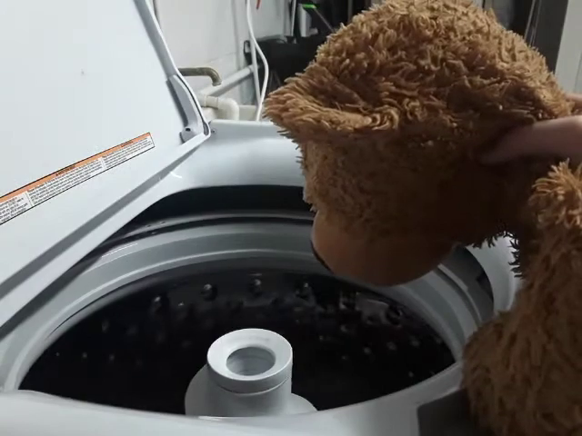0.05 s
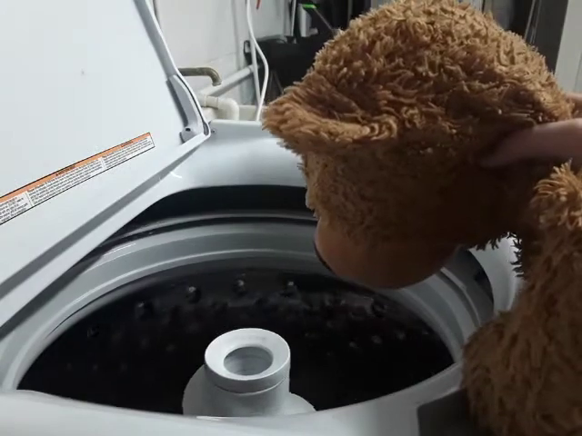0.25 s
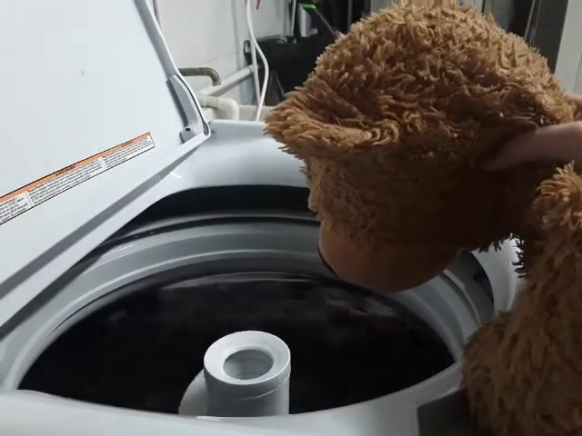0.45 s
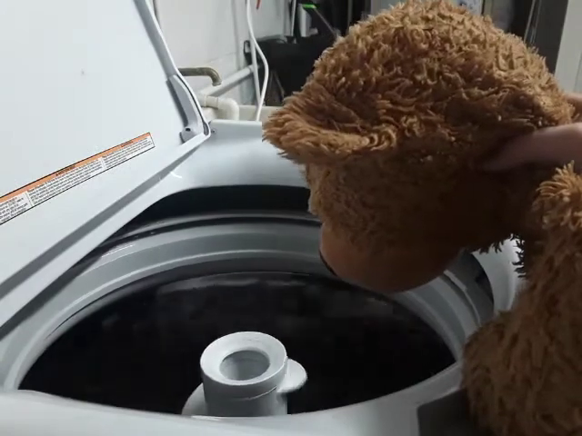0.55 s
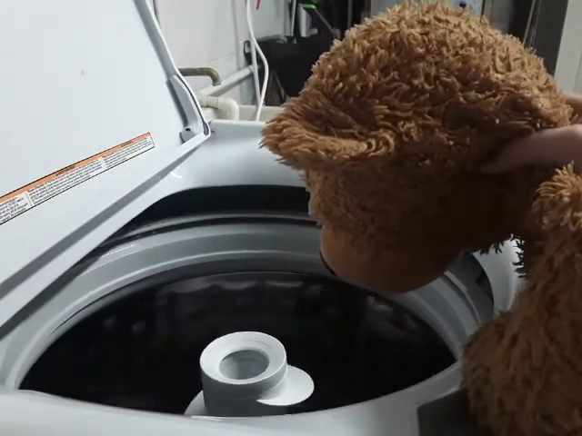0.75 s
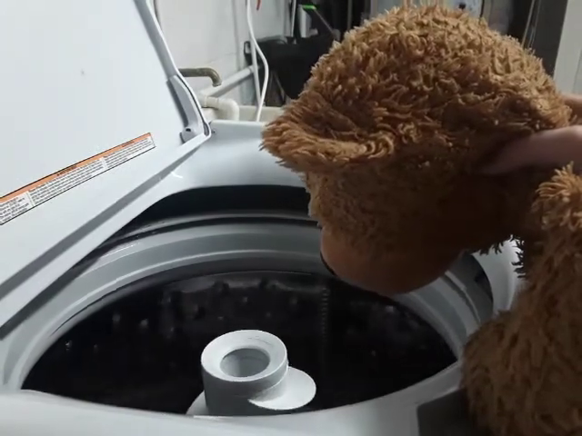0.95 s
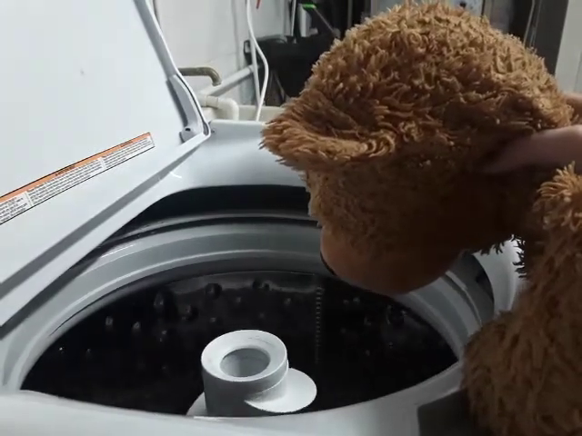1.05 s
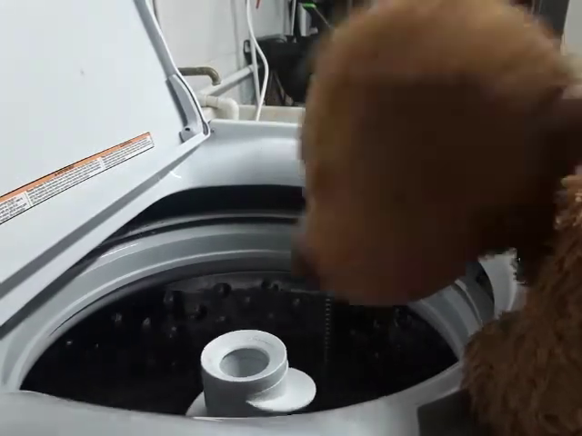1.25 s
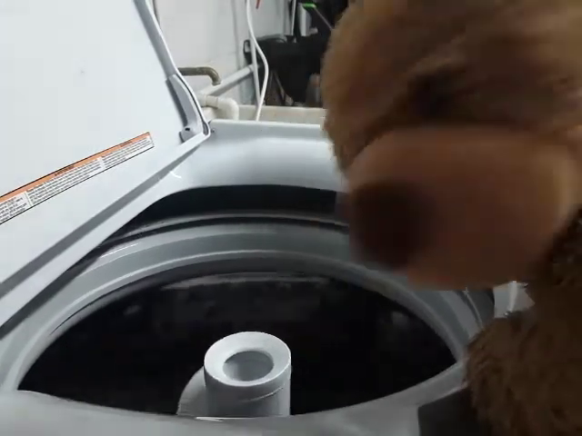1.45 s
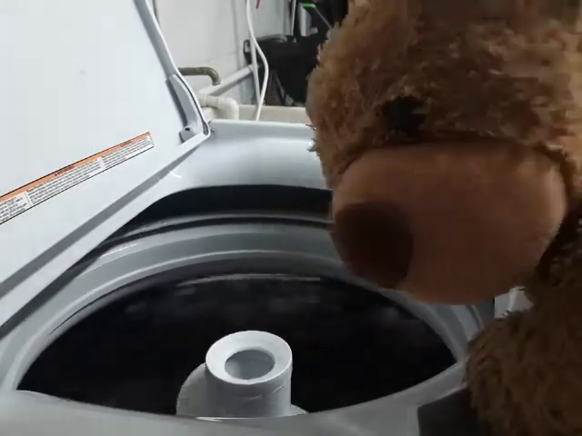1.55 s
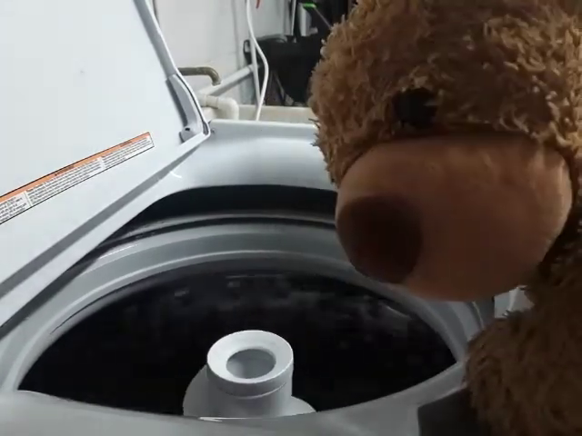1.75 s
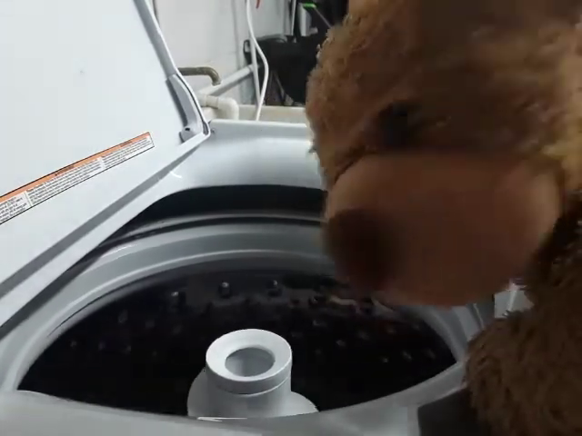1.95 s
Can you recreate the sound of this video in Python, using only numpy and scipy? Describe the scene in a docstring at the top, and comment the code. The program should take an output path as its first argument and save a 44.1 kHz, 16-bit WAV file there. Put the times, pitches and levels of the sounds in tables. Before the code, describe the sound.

A top-load washing machine agitates, heard close in wide stereo. The first 0.2 s is nearly quiet, with a low noise floor. At about 0.2 s the motor kicks in abruptly, humming, buzzing and whining as water swishes, splashing brightest near 0.55-0.6 s, then fading by 0.85 s. After a lull, a second stroke starts at 1.2 s, groans downward around 1.6 s, and water settles with a small splash near 1.8 s.

```python
"""Top-load washer agitating

Once a second the motor drives a stroke: sine hum and tones, and pulses with noise that ring the tub,
cabinet and gears. Shaped noise swishes and fizzes, short chirps make drops, and resonant noise bursts
make splashes, then the water settles. The second full stroke lets go with a falling groan.
Heard close, in wide stereo, with a short tail and a steady noise floor."""
import sys
import numpy as np
from scipy import signal
from scipy.fft import rfft, irfft
from scipy.io import wavfile
from scipy.ndimage import uniform_filter1d

SR = 44100
rng = np.random.default_rng(int(sys.argv[2]) if len(sys.argv) > 2 else 0)


def int16_out(signal):
    """Quantize to a 16-bit WAV file."""
    q = np.round(np.clip(np.atleast_2d(signal).T, -1, 1) * 32767)
    wavfile.write(sys.argv[1], SR, q.astype(np.int16))


N = 88200  # samples, 2 s


def amp(db):
    """Decibels to gain."""
    return 10 ** (np.asarray(db) / 20)


def evened(x):
    """Scale to rms 1."""
    return x / np.sqrt(np.mean(x ** 2) + 1e-20)


def read(points, hz):
    """Read a dB curve along a logarithmic pitch axis."""
    f, value = np.transpose(points)
    return np.interp(np.log(hz + 1), np.log(f + 1), value)


def level(table, column):
    """Column of a dB table as a gain over time."""
    rows = np.array(table)
    return amp(np.interp(np.arange(N) / SR, rows[:, 0], rows[:, column]))


def slow(rate):
    """Random wander of rms 1: noise averaged twice over 1/rate seconds."""
    width = int(SR / rate)
    return evened(uniform_filter1d(uniform_filter1d(rng.standard_normal(N), width), width))


def resonate(x, hz, width):
    """A fixed one-pole resonance with a gain of about 1 at its centre."""
    r = np.exp(-np.pi * width / SR)
    return 2 * signal.lfilter([1 - r], [1, -r * np.exp(2j * np.pi * hz / SR)], x).real


def resonate_twice(x, hz, width):
    """Two equal resonances in a row, evened to rms 1."""
    return evened(resonate(resonate(x, hz, width), hz, width))


def coloured(x, spectrum):
    """Weight the whole spectrum by a dB curve, then even it to rms 1."""
    return evened(irfft(rfft(x) * amp(read(spectrum, np.fft.rfftfreq(N, 1 / SR))), N))


def noise(spectrum, patchy_db, flicker_db):
    """Random short-time spectra with drifting patches and a flicker shared by all pitches."""
    frames, hz = N // 128 + 5, np.fft.rfftfreq(512, 1 / SR)
    a, b, patches = rng.standard_normal((frames, 257, 3)).T
    patches = evened(uniform_filter1d(uniform_filter1d(patches, 8, 0), 10, 1))
    flicker = evened(uniform_filter1d(rng.standard_normal(frames), 3))
    gain = amp(read(spectrum, hz)[:, None] + patchy_db * patches + flicker_db * flicker)
    return evened(signal.istft((a + 1j * b) * gain, nperseg=512, noverlap=384)[1][:N])


def load(column):
    """Motor load as a gain: each full stroke switches on abruptly, then follows its own curve."""
    # end of one stroke and two more, one list each: (time [s], hum level [dB], tub level [dB],
    # cabinet buzz level [dB], gear whine level [dB]), before the mix trims
    strokes = [
        [(0.0, -62, -38.5, -70, -58), (0.036, -57, -63, -89, -91), (0.072, -61, -69, -91, -83),
         (0.092, -60, -70, -91, -89), (0.104, -72.5, -66, -86, -100), (0.118, -74, -88, -86, -100),
         (0.128, -64, -89, -94, -90), (0.138, -80, -86, -98, -100), (0.166, -68, -87, -98, -100),
         (0.186, -83, -93, -106, -100), (0.2, -86, -87, -77, -99)],
        [(0.226, -92, -42, -41.5, -81), (0.268, -39, -36.5, -36.5, -69), (0.326, -42.5, -32, -31, -30),
         (0.364, -35, -33.5, -36.5, -37), (0.528, -43.5, -32.5, -32, -33.5), (0.608, -49, -33, -42, -44),
         (0.654, -44, -42, -51, -52.5), (0.85, -73, -54, -77, -112), (0.952, -56.5, -58.5, -76.5, -83),
         (1.036, -79, -98, -94, -71), (1.128, -63, -100, -92, -110), (1.186, -91, -91, -93, -100),
         (1.2, -84, -75, -79, -106)],
        [(1.226, -57, -41.5, -41, -67), (1.286, -43.5, -38.5, -36.5, -77), (1.352, -36, -37, -42, -44.5),
         (1.388, -41, -37, -40, -40), (1.42, -30, -36.5, -40.5, -51), (1.442, -36.5, -31.5, -36, -36.5),
         (1.56, -36, -35, -38, -42), (1.586, -52, -30, -43.5, -41.5), (1.66, -52, -54, -60, -53),
         (1.738, -48.5, -45, -51, -59), (1.772, -72, -44, -56, -50), (1.928, -55.5, -55.5, -67, -70),
         (2.0, -64, -58, -75, -83)],
    ]
    switch_on_s = 0.013
    jolt_db = -13.5  # level just after switch-on, relative to the stroke's first point
    rows = list(strokes[0])
    for stroke in strokes[1:]:
        on = stroke[0][0] - switch_on_s
        jolt = np.array(stroke[0][1:]) + jolt_db
        rows += [(on, *rows[-1][1:]), (on + switch_on_s / 4, *jolt), *stroke]
    return level(rows, column)


def background():
    """A steady noise floor, shaped by one fixed spectrum."""
    # noise floor spectrum: (frequency [Hz], relative level [dB])
    floor_curve = [(25, -21), (70, -1), (120, 13), (250, -7.5), (450, -27), (1200, -34.5), (2500, -20.5),
                   (5000, -28), (6600, -15.5), (7700, -35), (9500, -68), (13000, -8), (15800, -28)]
    return amp(-63) * coloured(rng.standard_normal(N), floor_curve)


def hum():
    """The windings hum at about twice the mains rate, wavering a little in pitch and level."""
    pitch_hz, pitch_waver_hz, level_waver_db = 119.2, 0.61, 1.5
    turns = np.cumsum(pitch_hz + pitch_waver_hz * slow(8.6)) / SR
    tone = np.sqrt(2) * np.sin(2 * np.pi * turns)
    return load(column=1) * tone * amp(level_waver_db * slow(21))


def ring(drive, modes, swell_db):
    """Each mode rings and swells on its own; neighbours alternate in sign."""
    total = 0
    for k, (hz, width, db) in enumerate(modes):
        total = total + (-1) ** k * amp(db + swell_db * slow(12.8)) * resonate_twice(drive, hz, width)
    return evened(total)


def motor():
    """Mains-rate pulses and rough noise shake tub, cabinet and gears, which ring at their modes."""
    # modes of tub, cabinet and gears: (frequency [Hz], width [Hz], relative level [dB])
    tub_modes = [(170.8, 50, -4), (200, 21.4, -4.5), (234.2, 28, 0), (287.2, 22, 0.5), (325.8, 24.4, -1.5),
                 (363, 21.7, 0.5), (392.6, 49, -7)]
    cabinet_modes = [(467.9, 49, 0), (530.4, 35, -3.5), (600, 30, -2.5), (704, 36, -15.5), (738, 11, -12)]
    gear_modes = [(795, 20, -11), (896, 34, 2), (1015, 150, -7), (1098.4, 26, 3.5), (1157.4, 17.6, -0.5),
                  (1304, 11, -19), (1635, 17, -5), (1679, 20, -8.5), (2270, 75, -7), (2430, 40, -1),
                  (2556, 100, -4)]
    # broad rumble spectrum: (frequency [Hz], relative level [dB])
    rumble_curve = [(40, -58), (70, -24), (95, -23), (150, -1.5), (400, 2), (650, -16), (1150, -6.5),
                    (1400, -16.5), (3000, -44.5), (6000, -61)]
    mains_hz, jitter, rough = 58.47, 0.02892, 0.66  # jitter: rms fraction of the rate; rough: noise share
    turns = np.cumsum(mains_hz * (1 + jitter * slow(59.8))) / SR
    pulses = np.diff(np.floor(turns), prepend=0) * amp(3.4 * slow(35))
    roughness = rng.standard_normal(N) * amp(1.63 * slow(110))
    drive = (1 - rough) * evened(pulses) + rough * roughness

    tub_load, cabinet_load = load(column=2), load(column=3)
    rumble = amp(-5) * coloured(drive, rumble_curve) * np.sqrt(tub_load * cabinet_load)
    rings = tub_load * ring(drive, tub_modes, swell_db=0.6)
    rings += cabinet_load * ring(drive, cabinet_modes, swell_db=0.5)
    rings += load(column=4) * ring(drive, gear_modes, swell_db=3.6)
    return rumble + amp(-4.5) * rings


def tones():
    """Cleaner lines: a rotor tone gliding through each stroke, and a gear mesh following the whine."""
    # rotor tone, one list per full stroke: (time [s], pitch [Hz], level before trim [dB])
    rotor_strokes = [
        [(0.23, 473.7, -41), (0.33, 493.4, -59), (0.334, 489.7, -31), (0.472, 466.2, -26), (0.486, 464.1, -54),
         (0.494, 468.5, -31), (0.538, 461.0, -21), (0.6, 465.8, -34.5)],
        [(1.23, 471.5, -41.5), (1.256, 478.8, -32.5), (1.41, 476.1, -39), (1.436, 467.2, -43),
         (1.456, 463.4, -54), (1.488, 475.4, -26), (1.514, 475.1, -46), (1.56, 475.3, -42)],
    ]
    rows = [(0, 470, -90), (.212, 470, -70), (.217, 470, -48), *rotor_strokes[0], (.64, 460, -80),
            (1.212, 470, -90), (1.217, 470, -48), *rotor_strokes[1], (1.6, 470, -80)]
    times, pitches, _ = np.transpose(rows)
    rotor_hz = np.interp(np.arange(N) / SR, times, pitches) + 4.0 * slow(37)
    rotor_gain = amp(-5 + 2.9 * slow(39)) * level(rows, column=2)
    rotor = rotor_gain * np.sin(2 * np.pi * np.cumsum(rotor_hz) / SR)
    mesh_hz = 1174 + 3.43 * slow(30)
    mesh = amp(-4) * load(column=4) * np.sin(2 * np.pi * np.cumsum(mesh_hz) / SR)
    return rotor + mesh


def drops():
    """Tiny bubbles at random moments: short decaying sines that rise slightly in pitch."""
    drops_per_s, spread_db = 3600, -10  # spread: average fall below the loudest drop
    size = amp(spread_db * np.minimum(rng.exponential(1, N), 4)) * (rng.random(N) < drops_per_s / SR)
    kind, out = rng.integers(0, 24, N), np.zeros(N)
    for k, hz in enumerate(np.geomspace(1300, 7000, 24)):
        u = np.arange(int(14 * SR / hz)) * hz / SR  # time in cycles of the starting pitch
        bubble = np.sin(2 * np.pi * u * (1 + 0.0096 * u)) * u * np.exp(-u / 1.25)
        out += signal.oaconvolve(size * (kind == k), bubble)[:N]
    return evened(out)


def water():
    """Moving water: a noise swish mixed with drops, and a fine fizz above it."""
    # water motion: (time [s], swish level [dB], fizz level [dB]), before the mix trims
    motion = [(0.0, -60.5, -66), (0.19, -81.5, -69.5), (0.32, -42.5, -52), (0.34, -45, -51.5),
              (0.37, -38.5, -47), (0.42, -37, -50), (0.44, -40.5, -46), (0.48, -35, -49),
              (0.52, -40, -39.5), (0.54, -36.5, -45), (0.56, -28.5, -47), (0.58, -35, -42),
              (0.6, -32.5, -36), (0.68, -46.5, -63), (0.7, -44.5, -53.5), (0.82, -60, -61.5),
              (0.99, -62.5, -66.5), (1.21, -89, -71), (1.27, -56, -57.5), (1.29, -38, -54),
              (1.36, -49, -49.5), (1.4, -39.5, -48.5), (1.42, -39.5, -42), (1.46, -35, -44),
              (1.55, -38.5, -45.5), (1.6, -36, -48.5), (1.77, -52.5, -56), (1.79, -44.5, -55),
              (1.91, -57, -63.5), (2.0, -65.5, -64)]
    # swish and fizz spectra: (frequency [Hz], relative level [dB])
    swish_curve = [(710, -1), (1200, -9), (1360, -8), (2130, -6.5), (2360, -9), (2840, -9), (4660, -13),
                   (5200, -15.5), (6530, -10.5), (7290, -16), (7860, -49), (9000, -27), (11700, -68),
                   (19800, -120)]
    fizz_curve = [(4590, -38), (7800, -18.5), (8760, -1.5), (9630, -2.5), (11900, 9), (12900, 9.5),
                  (15400, -3.5), (15800, 11)]
    swish = noise(swish_curve, patchy_db=1.54, flicker_db=2.97) + amp(-8.5) * drops()
    fizz = noise(fizz_curve, patchy_db=0.9, flicker_db=2.1)
    return level(motion, column=1) * amp(-4.0) * swish + level(motion, column=2) * amp(1.0) * fizz


def splashes():
    """Each splash is a tick and a burst of noise in one resonance, dying away."""
    # splashes: (start [s], nominal peak level [dB], pitch [Hz], width [Hz], time to fall 14 dB [s])
    splash_rows = [(.01, -60.5, 2180, 603, 0.057), (0.089, -63, 1770, 250, 0.052),
                   (.324, -37, 2400, 256, 0.09), (0.325, -40.5, 3630, 300, 0.04),
                   (0.452, -38, 3650, 1500, 0.0079), (.472, -32.5, 2425, 303, 0.09),
                   (.551, -33.5, 4750, 200, 0.034), (.552, -24.5, 3330, 700, 0.0053),
                   (0.555, -29, 13700, 2500, 0.013), (.6, -33, 6700, 1540, 0.033),
                   (.601, -29.5, 13200, 2940, 0.02), (0.691, -36.5, 2600, 300, 0.025),
                   (.703, -38.5, 4620, 590, .008), (0.928, -59.5, 5050, 2500, 0.082),
                   (1.02, -60.5, 1176, 150, 0.032), (1.022, -62.5, 2620, 300, .04),
                   (1.284, -40.5, 6340, 1440, 0.061), (1.285, -38.5, 1950, 1510, 0.014),
                   (1.414, -32, 13300, 3500, 0.039), (1.417, -35.5, 6480, 1210, 0.057),
                   (1.453, -38, 6600, 1200, .04), (1.47, -38.5, 4100, 500, 0.035),
                   (1.565, -36, 4600, 2000, 0.015), (1.606, -32, 3440, 1100, 0.017),
                   (1.782, -38.5, 1740, 980, 0.025)]
    rise_s, tick_db, crest_db = 0.0015, 4, 6  # crest: nominal peak above rms
    out, t = np.zeros(N + SR), np.arange(SR // 5) / SR
    for start, db, hz, width, length in splash_rows:
        drive = rng.standard_normal(len(t)) * (1 + amp(tick_db) * np.exp(-t / 0.00075))
        envelope = amp(db - crest_db - 14 * t / length) * np.minimum(t / rise_s, 1)
        out[round(start * SR):][:len(t)] += envelope * resonate_twice(drive, hz, width)
    return out[:N]


def groan():
    """A short falling groan as the second full stroke lets go: a sine gliding down to a lower pitch."""
    start_s, length_s, from_hz, to_hz = 1.56, 0.067, 420, 317.2
    u = np.clip((np.arange(N) / SR - start_s) / length_s, 0, None)
    hz = to_hz + (from_hz - to_hz) * np.exp(-2.5 * u) + 4.9 * slow(41)
    return amp(-23) * u * np.exp(-2.6 * u) * 2 * np.sin(2 * np.pi * np.cumsum(hz) / SR)


def taps(t60):
    """Tub and room tail: sparse taps of random sign, falling 60 dB in t60 seconds, energy 1."""
    count = SR // 2
    signs = rng.choice([-1., 1.], count) * (rng.random(count) < .06)
    tail = signs * amp(-60 * np.arange(count) / SR / t60)
    return tail / np.linalg.norm(tail)


def stereo(x):
    """Wide stereo: a side signal of randomly wandering phase, stronger in the treble than in the bass."""
    # width: (frequency [Hz], side minus mid [dB])
    side_curve = [(40, -19), (120, -14), (240, -18), (480, -3), (950, -5), (1890, 2.5), (3770, 2),
                  (7520, 2), (15000, 2)]
    # balance: (frequency [Hz], left minus right [dB])
    balance_curve = [(60, -6.5), (150, -0.5), (300, -2.5), (600, -5), (1200, 0.5), (2500, -1.5), (6000, 1),
                     (14000, -2)]
    hz, _, mid = signal.stft(x, SR, nperseg=512)
    wander = evened(uniform_filter1d(uniform_filter1d(rng.standard_normal(mid.shape), 3, 0), 4, 1))
    side = mid * np.exp(2j * wander) * amp(read(side_curve, hz))[:, None]
    tilt = amp(read(balance_curve, hz) / 2)[:, None]
    pair = np.array([(mid + side) * tilt, (mid - side) / tilt])
    return signal.istft(pair, SR, nperseg=512)[1][:, :N]


def scene():
    """Mix the washer, give all but the hum, tones and floor a tail, and spread it in stereo."""
    near = motor() + groan() + water() + splashes()
    tail = amp(-4) * signal.fftconvolve(near, taps(t60=0.33))[:N]
    return stereo(hum() + tones() + near + tail + background())


def record(dry):
    """The microphone's bass cut and the recorder's steep treble limit."""
    low_cut_hz, edge_hz = 70, 15900
    cut = signal.sosfilt(signal.butter(2, low_cut_hz, "high", fs=SR, output="sos"), dry)
    band_limit = signal.firwin(511, edge_hz, window=("kaiser", 9), fs=SR)
    return signal.oaconvolve(cut, band_limit[None], "same")


dry = scene()
out = record(dry)
int16_out(out)
```